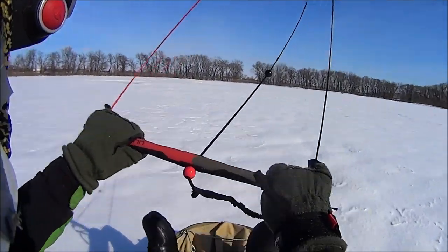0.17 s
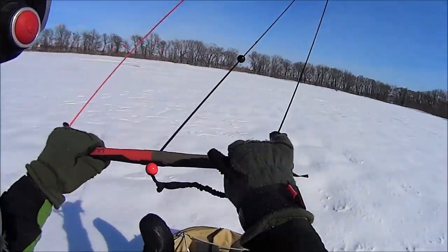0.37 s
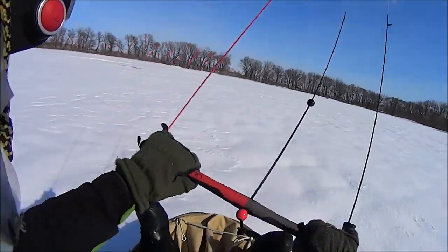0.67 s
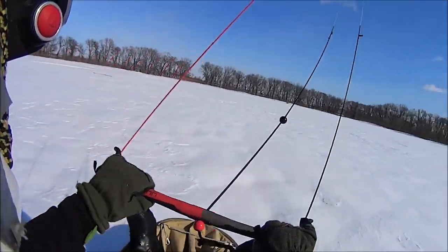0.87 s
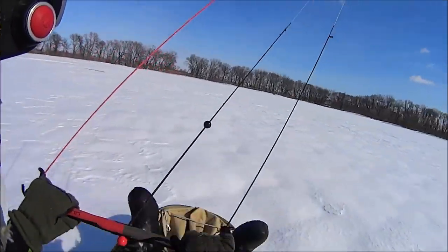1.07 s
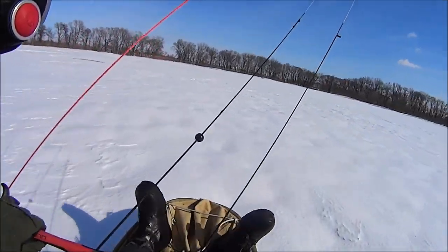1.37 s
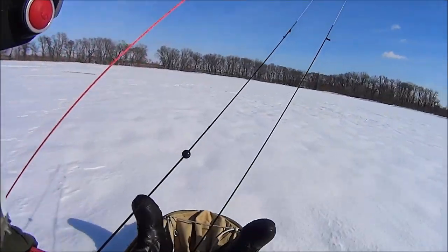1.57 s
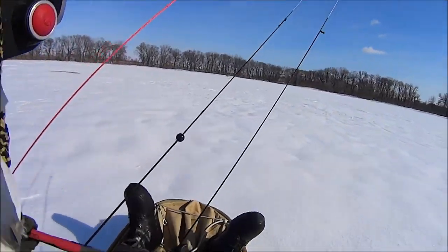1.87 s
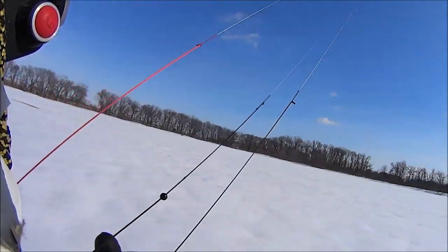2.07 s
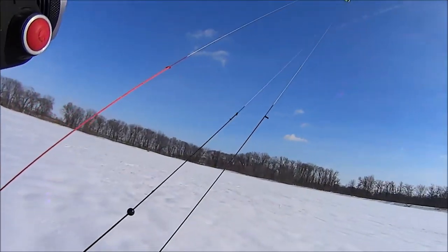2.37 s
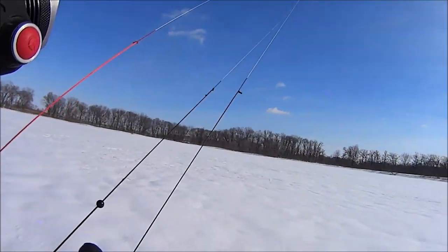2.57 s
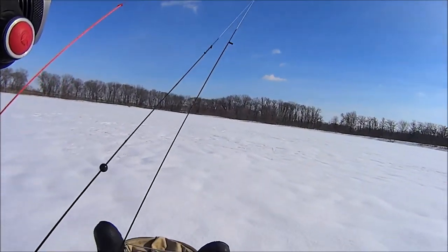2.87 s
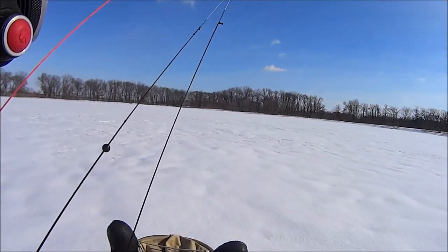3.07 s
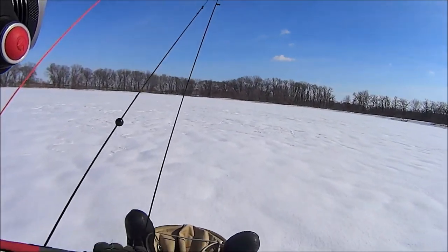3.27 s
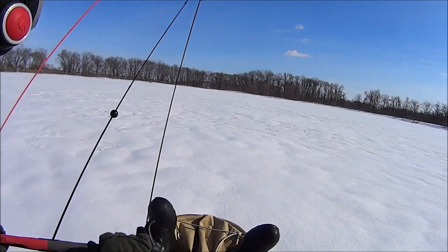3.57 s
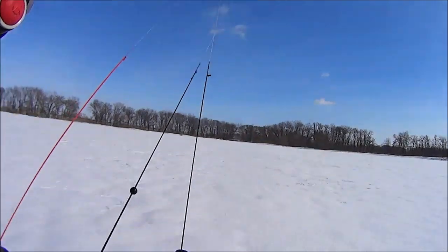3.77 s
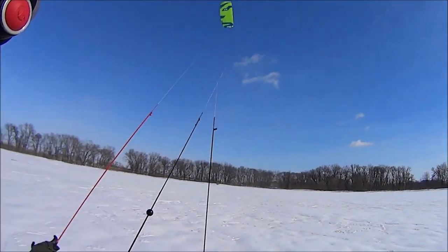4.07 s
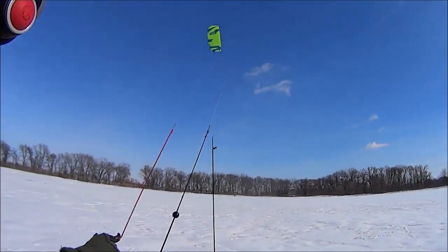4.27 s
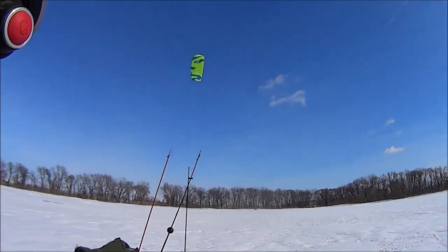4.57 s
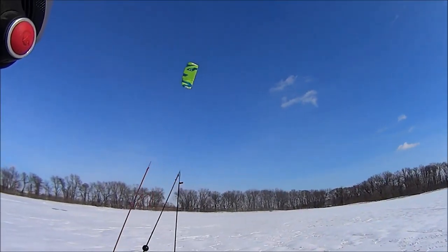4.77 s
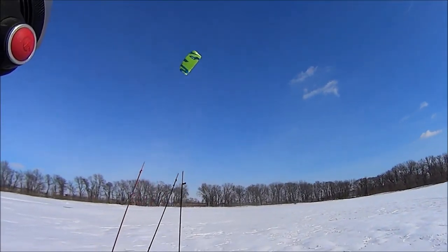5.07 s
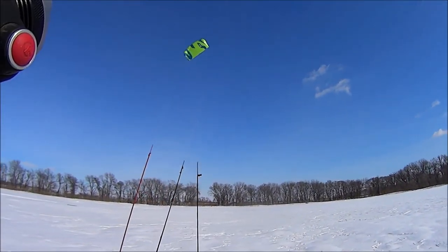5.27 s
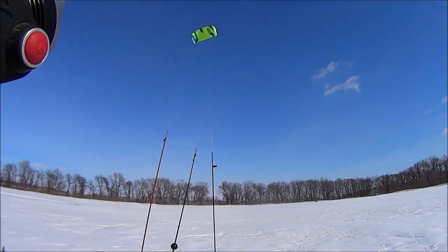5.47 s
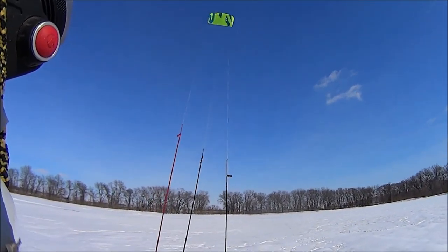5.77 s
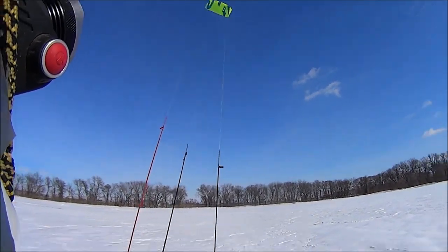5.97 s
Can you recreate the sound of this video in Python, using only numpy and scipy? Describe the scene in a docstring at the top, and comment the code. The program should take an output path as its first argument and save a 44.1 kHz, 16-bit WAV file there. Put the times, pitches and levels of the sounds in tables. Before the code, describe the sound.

A sled races over crusty snow, its hull drumming and rumbling unevenly while runners scrape, powder hisses and wind buffets the microphone.

```python
"""The hull of a kite-drawn sled drums as it runs fast over wind-crusted snow: random crust knocks ring it,
and rows of ripples add a wavering hum. It swishes through low drifts, falls quiet when it skips and slaps down.
The runners scrape in dense noise grains, powder hisses, bits of ice crack and ridges give deep thuds.
Wind, as low noise, buffets the two ports of the rider's microphone, and a fast limiter holds the roar down."""
import sys
import numpy as np
from scipy import signal
from scipy.fft import rfft, irfft, next_fast_len
from scipy.io import wavfile
from scipy.ndimage import uniform_filter1d, minimum_filter1d, map_coordinates

SR = 44100
rng = np.random.default_rng(int(sys.argv[2]) if len(sys.argv) > 2 else 0)


def put_to_file(sound):
    """Save the sound as 16-bit audio at rate SR, in the file named by the first command-line argument."""
    columns = np.atleast_2d(sound).T  # one column per channel
    safe = np.clip(columns, -1, 1)
    whole_steps = np.round(safe * 32767)
    wavfile.write(sys.argv[1], SR, whole_steps.astype(np.int16))


N = 270770
TIME = np.arange(N) / SR
CUTOFF_HZ = 11000   # top of the final sound

# the hull skips and slaps down; levels are relative:
# landing_s, air_s (time off the snow before it), pressure_db, slap_db, crunch_db
LANDINGS = [(.015, .03, -11.5, -9, -41), (0.063, 0.0074, -9, -5, -21), (0.253, 0.044, -4, -3, -38),
            (.304, .008, -7, -5, -26), (0.35, .016, -3, -3, -40), (0.492, 0.034, -8, 4, -44),
            (.599, 0.038, -13, -4, -31), (.616, .005, -2, -1, -27), (.649, 0.023, -34, -5.5, -44),
            (.702, 0.04, -36, -3.5, -20), (0.736, 0.015, -9, -9, -19), (0.808, .033, -4.5, -3, -20),
            (0.892, 0.057, -1, -19, -38), (.945, 0.024, 1, -4.5, -33), (0.991, 0.026, -8, -4, -26),
            (1.056, 0.021, -15, -22, -32), (1.19, 0.026, -6.5, -6, -38), (1.225, 0.015, -16, -10, -35),
            (1.294, .034, -10, -8, -24), (1.353, .012, -4, -5, -34), (1.5, 0.0079, 4, -9, -14.5),
            (1.557, 0.033, -4, -6, -32), (1.643, .01, 0, -5, -22), (1.745, 0.085, -7, -6, -30),
            (1.841, 0.08, -13, -24, -26), (1.861, .033, -3, -8, -21), (1.961, 0.023, -6, -10, -38),
            (2.001, 0.0071, -6, 0, -12), (2.121, .022, -15, -8.5, -19.5), (2.181, 0.052, -20, -22, -44),
            (2.216, .036, -5, -21, -42), (2.243, .012, -1, -1.5, -36), (2.29, .02, -7, -8, -38),
            (2.577, 0.058, -1.5, -3, -29), (2.666, 0.032, -1.5, -3, -36), (2.741, 0.039, -6, -14, -28),
            (2.808, .025, -6.5, 3.5, -40), (3.145, 0.033, -10, -2, -37), (3.19, .025, 0, 3, -36),
            (3.232, .022, -3, -7, -31), (3.275, 0.025, -12, 3.5, -20), (3.569, 0.086, -10.5, -1, -35),
            (3.613, 0.031, -7, -7, -30), (3.687, .036, -11, -4, -39), (3.741, 0.02, -11, -11, -33),
            (3.926, .012, -3, -2, -21), (4.054, 0.031, -2, -10, -40), (4.232, 0.025, -13, -18, -41),
            (4.286, .04, -6, -2, -28), (4.389, 0.12, -4, -6, -25), (4.514, 0.0098, -4, -7, -23),
            (4.584, .06, -17.5, -29, -29), (4.626, 0.032, -17, -5, -45), (4.665, 0.02, -20, -2.5, -38),
            (4.823, .048, -11, -2, -38), (5.03, 0.081, -5, -1.5, -37), (5.218, 0.0044, 0, 1, -40),
            (5.236, .012, -12, -17, -29), (5.34, .07, -3, -4, -38), (5.679, .025, -6, 2, -26),
            (5.979, 0.074, -23, -2, -42), (6.069, 0.02, -5, -16, -24)]
# the sled swishes through snowdrifts; bite of the runners, weight on the hull and loose powder, then ripples:
# crest_s, length_s, bite_db, weight_db, powder_db, ripples_per_s, ripple_depth_db
SNOWDRIFTS = [(0.059, .27, 2, 3, 4, 272, -3.5), (0.299, 0.062, 4.5, 2.5, 3.5, 213, 4),
              (0.443, 0.15, 6, 5, -2, 247, -3), (0.828, 0.06, 2, 6, 8, 330, -3.5),
              (1.148, 0.082, 6.5, -.5, -5, 340, -4), (1.47, 0.25, 7, 4, 1, 255, -2),
              (1.649, 0.028, 4, 1, 2, 257, -3.5), (2.05, 0.23, 6.5, 1.5, -3, 325, -3),
              (2.41, 0.17, 5.5, 4, -7, 215, 5.5), (2.603, 0.17, 3.5, -0.5, -1, 210, -10),
              (2.768, 0.078, 2.5, -1.5, -1, 190, 5), (2.919, 0.32, 6, 4.5, 2, 240, 0),
              (3.066, 0.06, 1.5, 0, 0, 290, -1), (3.314, 0.17, 1, 6, 3.5, 270, 0),
              (3.453, 0.071, 4, 4, 4, 275, -5.5), (3.528, 0.057, 7.5, 13.5, 2, 328, -12),
              (3.63, 0.091, 3, -1.5, 2, 270, -2), (3.885, 0.24, 5, 3.5, -2.5, 201, -14),
              (4.151, 0.11, 3.5, 5, 1, 300, -18), (4.46, .13, 6.5, 6, .5, 272, -8),
              (4.873, 0.23, 5.5, 1.5, 1, 235, -8), (5.017, 0.11, -0.5, -2.5, -2, 300, -5.5),
              (5.181, 0.24, 5.5, 4.5, 1.5, 245, -5.5), (5.467, .18, 7, 4.5, 2, 207, -7.5),
              (5.715, 0.089, 8, 6.5, 2.5, 258, 1), (5.842, 0.094, 6, 6.5, -2.5, 255, -2),
              (6.108, 0.23, 2.5, 3, 2, 235, -4)]


def from_db(db):
    """Decibels to gain."""
    return 10 ** (np.asarray(db) / 20)


def rms_one(x):
    """Scale to unit power."""
    return x / np.sqrt(np.mean(x ** 2) + 1e-20)


def in_time(rows):
    """Each column of a curve at every sample."""
    s, *columns = np.transpose(rows)
    return [np.interp(TIME, s, column) for column in columns]


def colour(x, spectrum):
    """Give a signal a spectrum drawn on a log-frequency axis."""
    hz, db = np.transpose(spectrum)
    size = next_fast_len(N)
    bins = np.maximum(np.fft.rfftfreq(size, 1 / SR), 1)
    gain = from_db(np.interp(np.log(bins), np.log(hz), db))
    return irfft(rfft(x, size) * gain, size)[..., :N]


def cut(x, hz, kind, order=2):
    """Butterworth low- or high-pass."""
    sections = signal.butter(order, min(hz, .45 * SR), kind, fs=SR, output="sos")
    return signal.sosfilt(sections, x + 1e-18)


def drift(rate):
    """A smooth random wander with spread 1, changing about `rate` times a second."""
    # drawn at every 40th sample, past the filter's start-up
    r = np.exp(-80 * np.pi * rate / SR)
    slow = signal.lfilter([1], [1, -2 * r, r * r], rng.standard_normal(N // 40 + 2002))[2000:]
    return np.interp(np.arange(N) / 40, np.arange(len(slow)), rms_one(slow))


def pan(db):
    """Left and right gains for a level difference."""
    return from_db(np.array([db, -db]) / 2)


def two_ports(mid, side, side_db):
    """Left and right from a shared and an opposed part, at unit power."""
    opposed = side * np.array([[1], [-1]])
    return rms_one(mid + from_db(side_db) * opposed)


def grains(per_s, spread_db):
    """Random clicks of uneven size."""
    steps = np.minimum(rng.exponential(1, N), 4)
    sizes = from_db(spread_db * steps) * rng.choice([-1, 1], N)
    return rms_one(sizes * (rng.random(N) < per_s / SR))


def bursts(events, decay_s):
    """An envelope that jumps at each event and dies away."""
    kicks = np.zeros(N)
    for s, db in events:
        kicks[int(np.clip(s * SR, 0, N - 1))] += from_db(db)
    return signal.lfilter([1], [1, -np.exp(-1 / (decay_s * SR))], kicks + 1e-18)


def swell_at(s, length_s):
    """A smooth bell-shaped swell around one moment."""
    return np.exp(-2 * ((TIME - s) / length_s) ** 2)


def drumming(load_db, ripple, ripple_db=1.06, lump_db=1.0, steady_s=0.0195, glide_db=-29.5):
    """Crust knocks ring the hull and ripples add a hum; the load sets the strength over a soft steady rumble."""
    knocks = [hull_body(grains(per_s=1000, spread_db=1.5), wander_db=5.5) for _ in range(2)]
    mid, side = [rms_one(flexing(part)) for part in knocks]
    boom = two_ports(mid + washboard(), side, side_db=-16.0)
    # the rider's weight bounds the force, so the strength evens out over a few cycles
    power = uniform_filter1d(np.mean(boom ** 2, axis=0), max(int(steady_s * SR), 1))
    steady_boom = rms_one(boom / np.sqrt(power + 0.076))
    # small hollows only take load off the hull
    hollows = rms_one(from_db(lump_db * np.minimum(drift(31.0), 0)))
    load = from_db(load_db + ripple_db * ripple) * hollows
    return steady_boom * np.sqrt(load ** 2 + pressing() ** 2 + from_db(glide_db) ** 2)


def hull_body(force, low_hz=120, soft_hz=620, wander_db=0):
    """Snow pushes softly on the shell, which rings in a few modes and is too small to radiate deep bass."""
    # hull resonances: pitch_hz, width_hz, level_db
    modes = [(190.3, 18.8, 6), (233, 31.5, 5), (347, 74, 5), (454, 29, -3.5), (640, 260, -21.5),
             (1157, 70, -11)]
    push = cut(force, soft_hz, "low")
    ringing = 0
    for hz, width_hz, db in modes:
        r = np.exp(-np.pi * width_hz / SR)
        poles = [1, -2 * r * np.cos(2 * np.pi * hz / SR), r * r]
        # the point of contact moves along the hull and favours now one mode, now another
        share = from_db(db + wander_db * drift(4.14))
        ringing = ringing + (1 - r * r) / 2 * signal.lfilter([1, 0, -1], poles, share * push)
    return cut(ringing, low_hz, "high", order=3)


def flexing(x, sway_s=0.002216, rate=4.976):
    """The shell bends as it rides: a wandering time shift slides its resonances up and down."""
    return map_coordinates(x, [(TIME + sway_s * drift(rate)) * SR], order=1, mode="mirror")


def washboard(jitter=.17, overtone_db=-17.5, swell_db=3.5):
    """Wind-carved ripples, spaced by each drift and gliding to the next, shake the sled at a wandering pitch."""
    ripples = [(crest, per_s, db) for crest, *_, per_s, db in SNOWDRIFTS]
    hz, depth_db = in_time(ripples)
    phase = 2 * np.pi * np.cumsum(hz * np.exp(jitter * drift(54.94))) / SR
    shake = np.sin(phase) + from_db(overtone_db) * drift(39) * np.sin(2 * phase)
    return rms_one(shake * from_db(swell_db * drift(13.7))) * from_db(depth_db)


def pressing(press_db=-10.0, press_s=0.016):
    """After a landing the rider's weight bears on the hull for a moment, then springs back."""
    gain = np.zeros(N)
    for landing, _, _, db, _ in LANDINGS:
        down = slice(*np.searchsorted(TIME, [landing, landing + press_s]))
        push = np.sqrt(np.abs(np.sin(np.pi * (TIME[down] - landing) / press_s)))
        gain[down] += from_db(db + press_db) * push
    return gain


def contact(edge_s=0.0077, lift_s=0.0061):
    """Pressure lost before a landing, in dB: the sound eases off as the hull lifts and returns quickly."""
    db = np.zeros(N)
    for landing, air_s, pressure_db, _, _ in LANDINGS:
        takeoff = landing - air_s
        aloft = slice(*np.searchsorted(TIME, [takeoff, landing]))
        lifting_db = pressure_db * (1 - np.exp((takeoff - TIME[aloft]) / lift_s))
        db[aloft] = np.minimum(db[aloft], lifting_db)
    return uniform_filter1d(db, max(int(edge_s * SR), 1))


def snowdrifts():
    """Each drift is one smooth swell; gives bite, weight and powder in dB relative to the flat."""
    rows = np.array(SNOWDRIFTS)
    crest, length = rows[:, :1], rows[:, 1:2]
    swells = np.exp(-np.pi * ((TIME - crest) / length) ** 2)
    return rows[:, 2:5].T @ swells


def slaps(slap_db=-11.0, crunch_db=4.0, crunch_hz=1300):
    """A landing is one short push that rings the whole shell, and the crust caves in with a dull crunch."""
    pushes = bursts([(s, db) for s, _, _, db, _ in LANDINGS], decay_s=0.00015)
    boom = hull_body(pushes, soft_hz=674)
    # one lone push sets the reference level
    unit = hull_body(bursts([(0, 0)], decay_s=.00015), soft_hz=750)
    crust = cut(grains(per_s=5500, spread_db=-3.0), 264, "high")
    crust = rms_one(cut(crust, 800, "low", order=3))
    caving = bursts([(s, db) for s, *_, db in LANDINGS], decay_s=0.0097)
    crunch = cut(crust * caving, crunch_hz, "low")
    return from_db(slap_db) * boom / np.max(np.abs(unit)) + from_db(crunch_db) * crunch


def scrape(scrape_db, ripple, looking_up, ripple_db=1.9):
    """Crust breaks in dense grains along the runners; the colour turns with the rider's head."""
    # spectra with the head ahead and turned up to the kite: pitch_hz, level_db
    ahead = [(100, -11), (500, 3), (900, 3.5), (1250, -0.2), (1600, -4.5), (2250, -4), (2800, -11),
             (4000, -14.5), (6000, -24), (11000, -31.5)]
    upward = [(100, -7), (500, 0), (900, 3.5), (1250, -0.5), (1600, -5.5), (2250, -6), (2700, -9),
              (3250, -9.5), (3800, -17), (4500, -15), (6000, -29), (11000, -45)]
    # the scrape favours one side: pitch_hz, left_right_db
    balance = [(500, -12.5), (1150, 7), (1700, 3), (2300, 1), (3000, 0), (11000, -1)]
    grit = two_ports(grains(per_s=12000, spread_db=2.5), rng.standard_normal(N), side_db=-6.5)
    grit = grit * from_db(ripple_db * ripple)
    rasp_ahead = rms_one(colour(grit, ahead))
    rasp_upward = rms_one(colour(grit, upward))
    rasp = (1 - looking_up) * rasp_ahead + looking_up * rasp_upward
    sides = [colour(port, [(hz, sign * db / 2) for hz, db in balance]) for port, sign in zip(rasp, (1, -1))]
    return rms_one(np.array(sides)) * from_db(scrape_db)


def spray(hiss_db, ripple, ripple_db=1.57, floor_db=-52.0):
    """Fine crystals hiss off the runners; a little of the hiss stays even between drifts."""
    # hiss spectrum: pitch_hz, level_db
    hiss = [(1500, 2), (3500, 3.5), (5000, 1.5), (6000, 0), (7000, 0), (8000, -2), (11000, -5.5)]
    fine = two_ports(grains(per_s=18000, spread_db=4.5), rng.standard_normal(N), side_db=-12.5)
    strength = np.hypot(from_db(hiss_db + ripple_db * ripple), from_db(floor_db))
    return rms_one(colour(fine, hiss)) * strength


def patchy(x, patch_db=1.5, rate=20, low_hz=500, count=22):
    """The snow changes from spot to spot, so narrow bands swell and sink each on their own."""
    size = next_fast_len(N)
    spectrum = rfft(x, size)
    place = np.log(np.maximum(np.fft.rfftfreq(size, 1 / SR), 1))
    centres = np.linspace(np.log(low_hz), np.log(CUTOFF_HZ), count)
    # overlapping triangles on a log-frequency axis
    bands = (irfft(spectrum * np.interp(place, centres, one), size)[..., :N] for one in np.eye(count))
    return sum(band * from_db(patch_db * drift(rate)) for band in bands)


def cracks(low_hz=1400):
    """A bit of ice under the runners snaps with one sharp tick or crumbles for a few milliseconds."""
    # cracks, timed at their loudest: peak_s, level_db, length_s
    ticks = [(.4135, -28, .0025), (0.424, -25, 0.0029), (.4495, -30.5, 0.0041), (0.5195, -28, 0.0013),
             (.5421, -30, .0011), (.694, -34, 0.0038), (0.802, -30.5, 0.0045), (1.45, -28.5, .003),
             (1.524, -27, 0.0019), (1.902, -33, .002), (2.438, -31, 0.0011), (2.759, -36, .008),
             (3.052, -36, .008), (3.401, -31, 0.0027), (3.861, -28, 0.0012), (4.139, -31, .002),
             (4.274, -33, 0.0024), (4.451, -32, .004), (5.164, -35, .004), (5.251, -33, .007),
             (5.882, -35.5, .008)]
    snap = cut(two_ports(*rng.standard_normal((2, N)), side_db=-10.0), low_hz, "high")
    return snap * sum(from_db(db) * swell_at(s, length) for s, db, length in ticks)


def heaves(top_hz=105):
    """The whole sled flexes on a ridge: a deep shudder of low noise that reaches both ports alike."""
    # thuds, timed at their loudest: peak_s, level_db, length_s, lowest_hz
    ridges = [(.29, -31, .13, 65), (2.3, -29, 0.13, 25), (3.782, -34, .14, 25), (5.48, -32, .18, 70)]
    shudder = cut(rng.standard_normal(N), top_hz, "low", order=3)
    thuds = 0
    for s, db, length, low_hz in ridges:
        thud = rms_one(cut(shudder, low_hz, "high", order=3))
        thuds = thuds + thud * from_db(db) * swell_at(s, length)
    return thuds


def wind(rumble_db, lump_db=2.5, eddy_db=-0.5, buffet_s=0.02):
    """Lumpy turbulence and single eddies push the two ports mostly against each other."""
    # single eddies push the two ports mostly against each other, levels relative: peak_s, level_db
    buffets = [(0.057, -13), (0.159, -7.5), (0.747, -11.5), (1.555, -7.5), (2.479, -18), (2.924, -15),
               (3.032, -14.5), (3.296, -19), (3.47, -21), (4.262, -12), (4.95, -21), (5.2, -27),
               (5.46, -23)]
    # spectra of the flow and of the eddies: pitch_hz, level_db
    flow_spectrum = [(12, -20), (30, -7.5), (55, -6.5), (90, 0), (170, 3.5), (260, 1), (400, -15),
                     (800, -26), (2000, -66)]
    eddy_spectrum = [(25, -24), (80, 20), (200, 19.5), (380, 17.5), (700, 5.5), (1200, -10), (3000, -53.5)]
    flow = two_ports(*rng.standard_normal((2, N)), side_db=7.0)
    lumps = from_db(lump_db * drift(26))
    rumble = rms_one(colour(flow, flow_spectrum) * lumps) * from_db(rumble_db)
    swirl = two_ports(*rng.standard_normal((2, N)), side_db=11.0)
    puffs = sum(from_db(db) * swell_at(s, buffet_s) for s, db in buffets)
    return rumble + from_db(eddy_db) * puffs * rms_one(colour(swirl, eddy_spectrum))


def scene(wind_db=-2.0, scrape_lift=0.088, spray_lift=0.21, looking_up_db=-2.0, snow_db=1.26, clear_s=0.028):
    """Hull, runners and wind; drifts, skips and one ripple of the ground shape drum, scrape and spray together."""
    # airflow over the ports, levels relative: time_s, rumble_db
    airflow = [(0.0, -29), (0.27, -17.5), (0.6, -29), (0.74, -23), (0.92, -33), (1.17, -17.5), (1.4, -31),
               (1.62, -17), (1.85, -25), (2.35, -18.5), (2.7, -23), (3.3, -18.5), (4.25, -22.5),
               (4.82, -36), (5.2, -33), (5.7, -23.5), (5.9, -46), (6.14, -40)]
    # the rider's head turns up to the kite: time_s, left_right_db
    heading = [(0, 0.7), (2.6, 0.6), (3.6, 0.1), (4.5, -2), (5.3, -3), (6.14, -3)]
    # relative levels on the flat crust between drifts
    drumming_db, scrape_db, spray_db = -17.0, -32.5, -48
    (rumble_db,), (side_db,) = in_time(airflow), in_time(heading)
    bite_db, weight_db, powder_db = snowdrifts()
    ripple, skip_db = drift(34.5), contact()
    # mainly the longer skips lift the runners clear of the snow
    clear_db = uniform_filter1d(skip_db, max(int(clear_s * SR), 1))
    looking_up = np.interp(TIME, [3.7, 4.5], [0, 1])
    hull = drumming(drumming_db + weight_db + skip_db, ripple) + slaps()
    runners_db = scrape_db + bite_db + scrape_lift * clear_db + looking_up_db * looking_up
    runners = scrape(runners_db, ripple, looking_up)
    crystals = spray(spray_db + bite_db + powder_db + spray_lift * clear_db, ripple)
    snow = from_db(snow_db) * patchy(runners * pan(side_db) + crystals * pan(0.24 * side_db))
    return hull * pan(side_db) + snow + cracks() + heaves() + wind(rumble_db + wind_db)


def record(dry, ceiling_db=-5.3, release_db_per_s=450):
    """A fast look-ahead limiter holds down the mean of the ports and the peak of each, then the top is cut."""
    port_peak = np.max(np.abs(dry), axis=0) / .93
    mean_peak = np.abs(np.mean(dry, axis=0)) / from_db(ceiling_db)
    over_db = 20 * np.log10(np.maximum(np.maximum(mean_peak, port_peak), 1))
    # the reduction jumps up at once and falls at the release rate
    release_db = release_db_per_s * TIME
    held_db = np.maximum.accumulate(over_db + release_db) - release_db
    gain_db = uniform_filter1d(minimum_filter1d(-held_db, size=65), size=65)
    top_cut = signal.ellip(12, .05, 60, CUTOFF_HZ, fs=SR, output="sos")
    return signal.sosfiltfilt(top_cut, dry * from_db(gain_db))


dry = scene()
out = record(dry)
put_to_file(out)
```